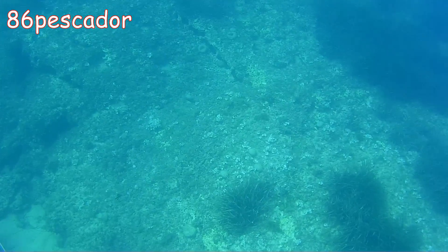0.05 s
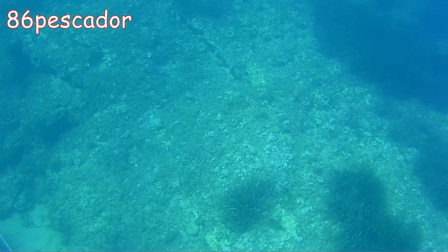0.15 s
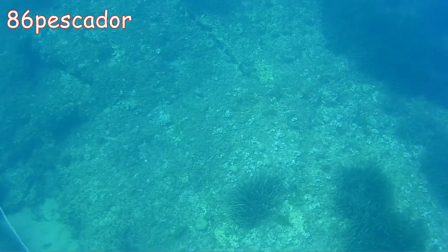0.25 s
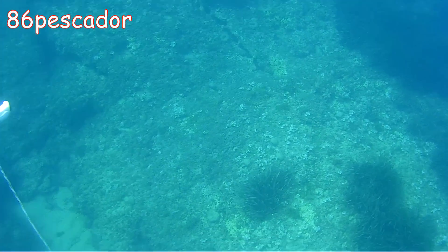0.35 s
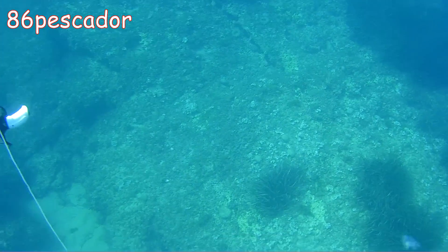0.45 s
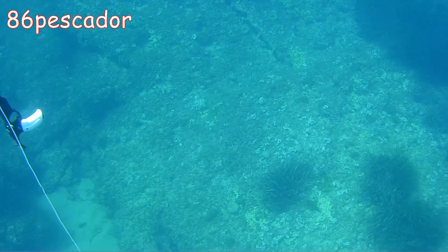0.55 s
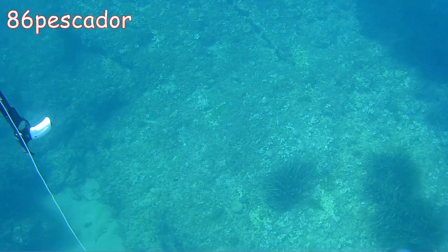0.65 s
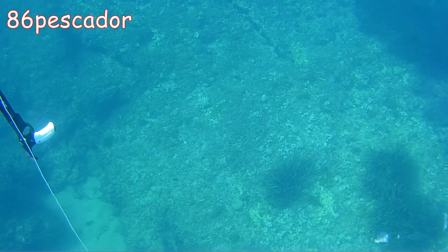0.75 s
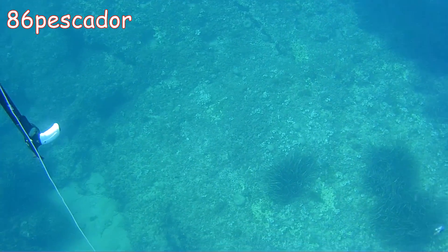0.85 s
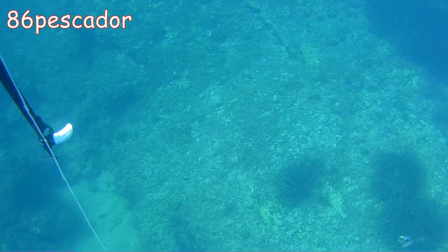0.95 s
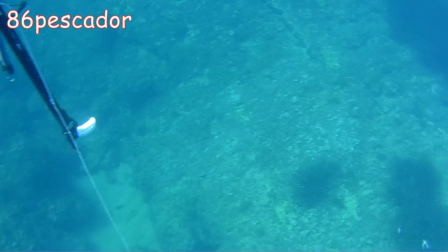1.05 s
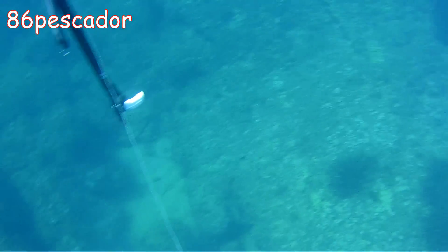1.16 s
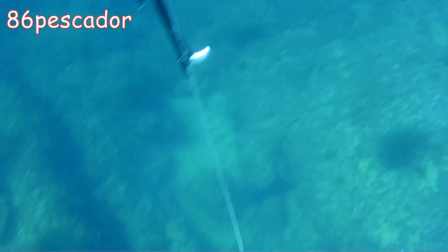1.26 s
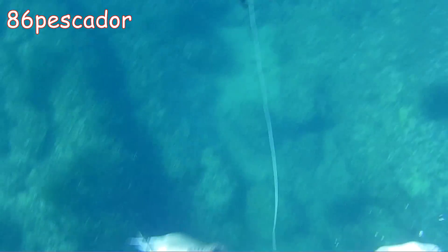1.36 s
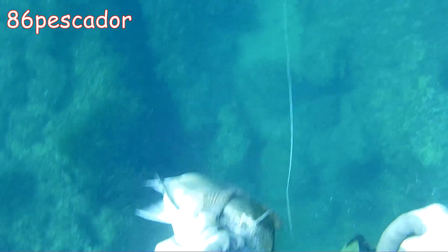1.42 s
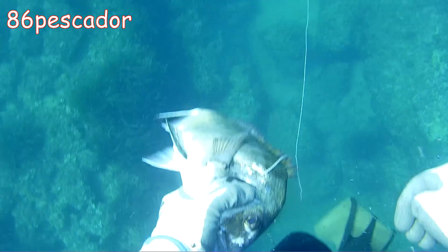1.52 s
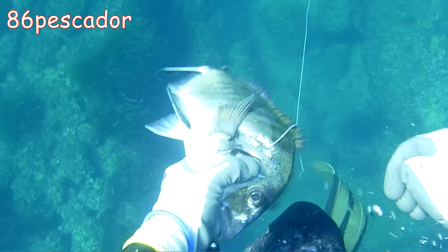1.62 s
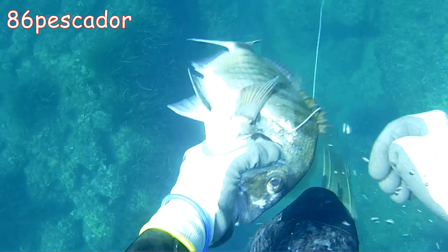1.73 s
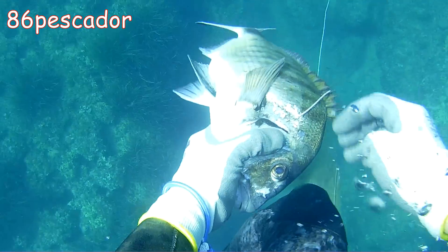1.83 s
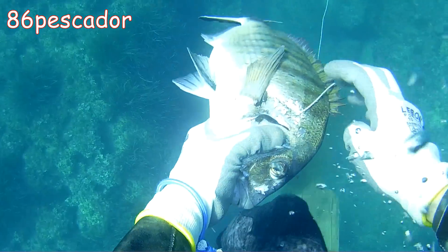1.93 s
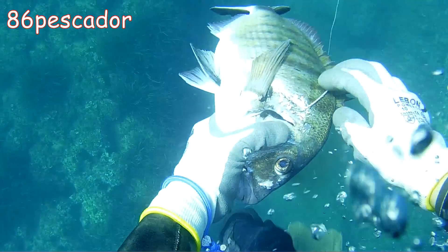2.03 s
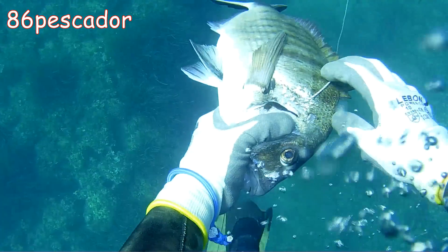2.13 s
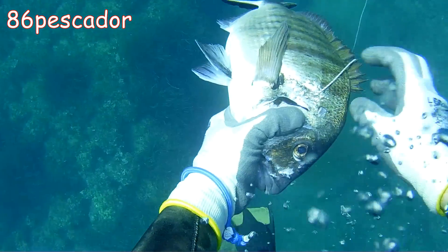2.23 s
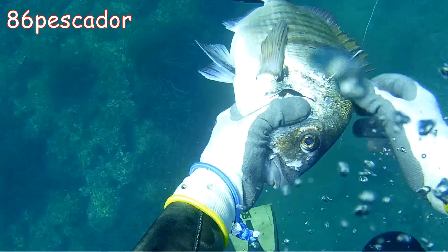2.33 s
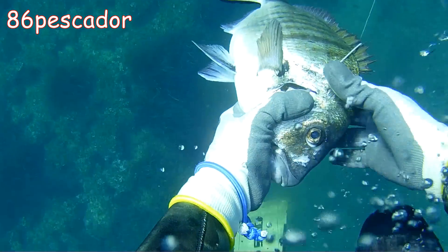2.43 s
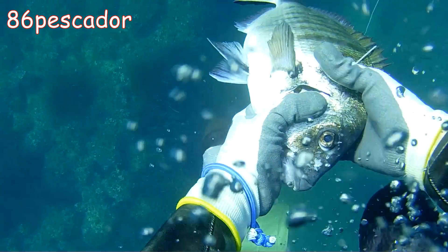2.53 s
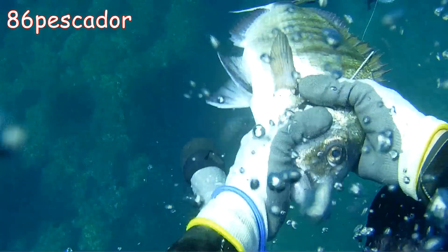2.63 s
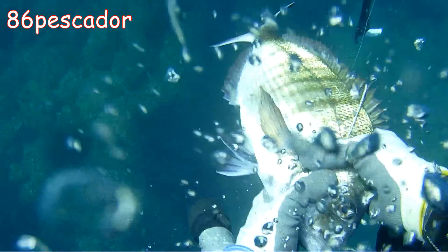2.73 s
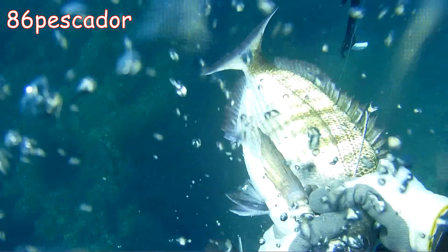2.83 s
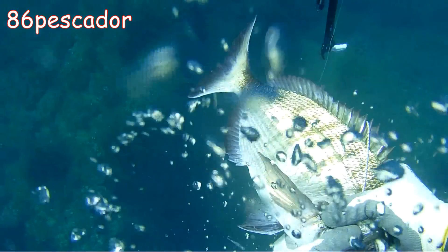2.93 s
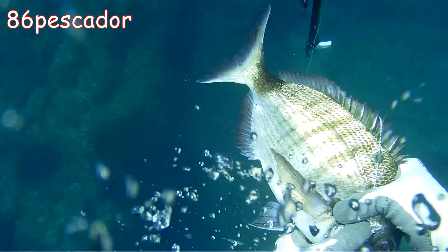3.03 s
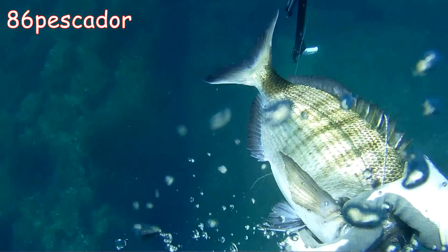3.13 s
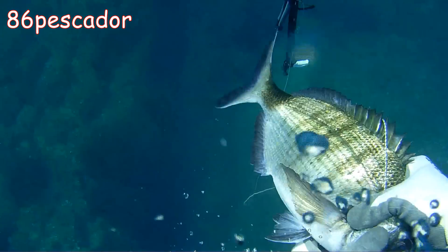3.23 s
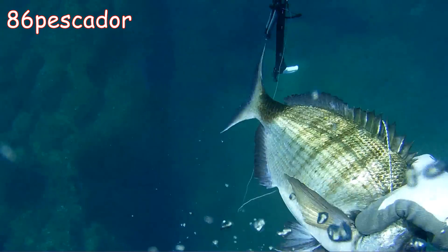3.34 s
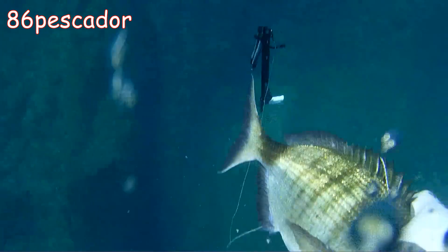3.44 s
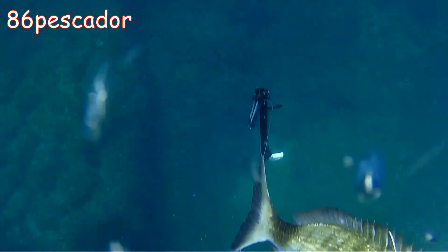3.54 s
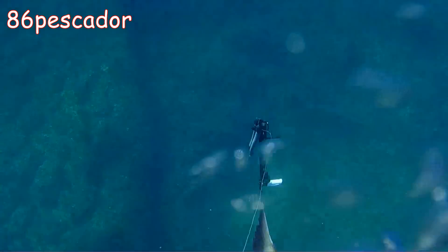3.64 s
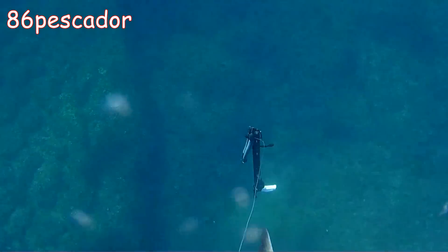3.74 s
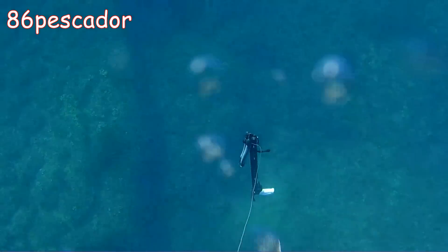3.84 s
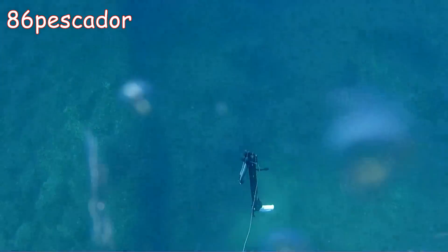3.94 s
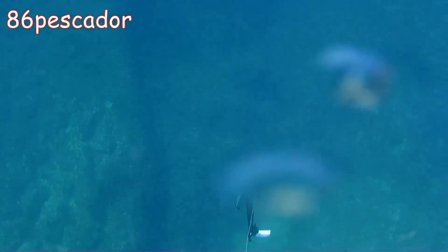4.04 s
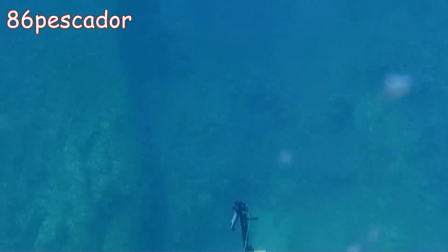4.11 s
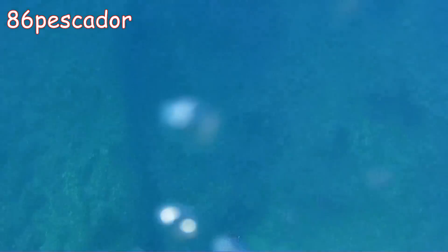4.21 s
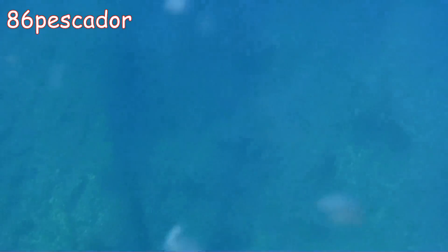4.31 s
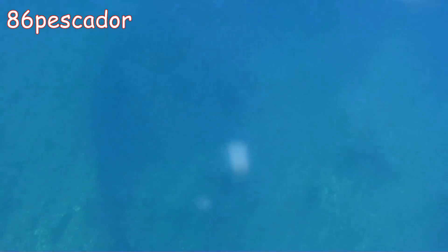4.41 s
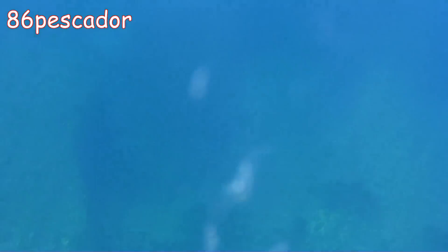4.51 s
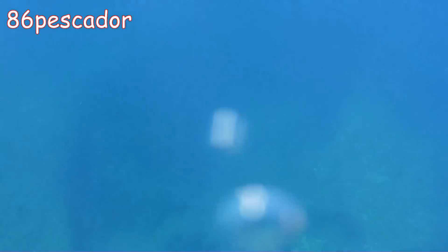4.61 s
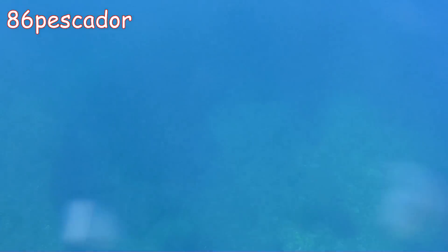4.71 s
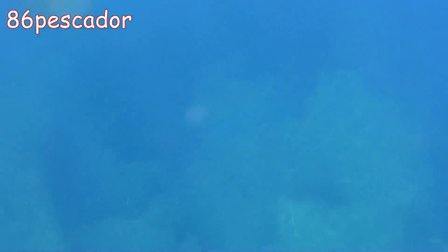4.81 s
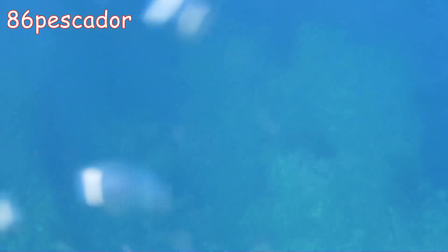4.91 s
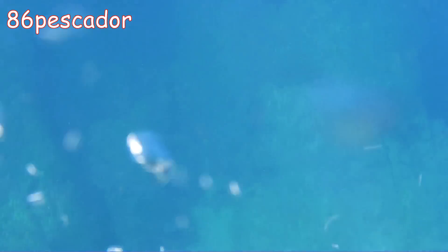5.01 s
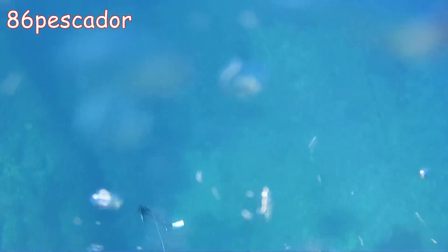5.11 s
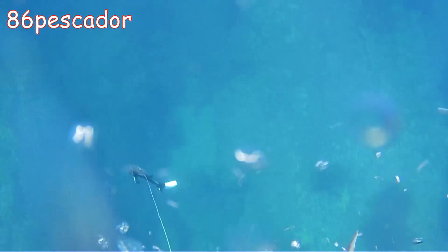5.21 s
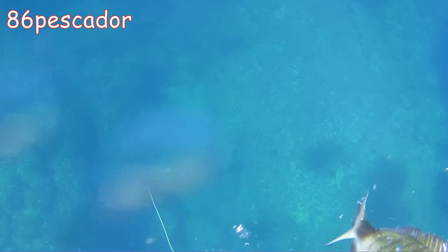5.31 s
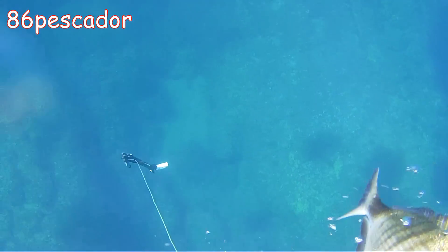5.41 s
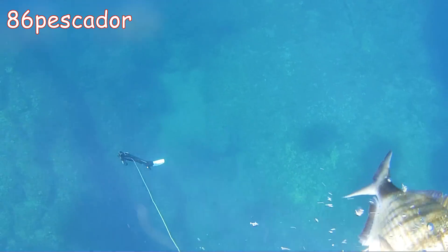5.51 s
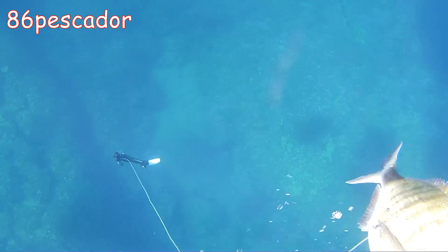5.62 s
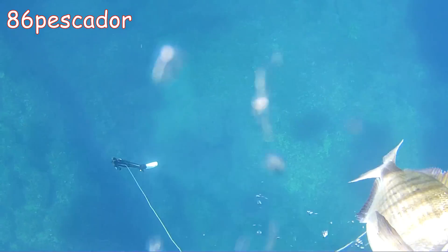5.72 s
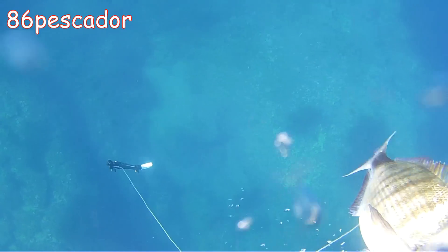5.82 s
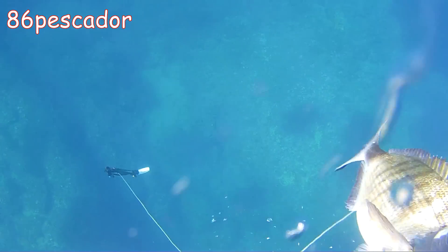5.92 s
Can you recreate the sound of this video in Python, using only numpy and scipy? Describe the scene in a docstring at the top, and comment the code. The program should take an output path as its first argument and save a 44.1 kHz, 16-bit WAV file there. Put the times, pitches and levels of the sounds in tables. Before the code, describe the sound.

A diver handles a fish in the sea, but only water, air and gear are heard. The first second and a half is hushed, with small hard taps. Then air streams past the enclosed microphone in uneven gushes: deep gulps, mid-pitched gurgling, light fizz and a low hum of larger pockets. It dips briefly near five seconds, then close plops return.

```python
"""Air bubbles stream past a camera in a sealed case under water, in gushes, with single bubbles close by.
Each bubble is a short ringing tone with a pitch set by its size: big ones gulp, middling ones gurgle,
small ones fizz. Large air pockets hum low, and the finest bubbles hiss like mist.
The resonances of the case colour the stream, the mist and part of the close bubbles.
Three hard clicks, made of short ringing tones, and a quiet wash of filtered noise for the sea join in."""
import sys
import numpy as np
from scipy import signal
from scipy.fft import rfft, irfft
from scipy.io import wavfile
from scipy.ndimage import uniform_filter1d

SR = 44100
rng = np.random.default_rng(int(sys.argv[2]) if len(sys.argv) > 2 else 0)


def wav_record(signal):
    """Record a signal, one row per channel, as 16-bit PCM in the file named by sys.argv[1]."""
    frames = np.transpose(np.atleast_2d(signal))
    bounded = np.clip(frames, -1, 1)
    # unit amplitude maps onto the largest positive 16-bit level
    quanta = np.round(bounded * 32767).astype(np.int16)
    wavfile.write(sys.argv[1], SR, quanta)


N = 262836
TIME = np.arange(N) / SR  # [s]
# t60 is the time a sound takes to fall by 60 dB; after a gush the small bubbles are gone first
LARGE_T60_S, MIDDLING_T60_S, SMALL_T60_S = 0.75, 0.53, 0.4


def undb(db):
    """Turn decibels into a gain."""
    return 10 ** (np.asarray(db) / 20)


def unit(x):
    """Scale a sound to an rms (average strength) of 1."""
    return x / np.sqrt(np.mean(x ** 2))


def add(out, s, sound):
    """Mix a sound in, starting at time s in seconds."""
    i = int(np.clip(s * SR, 0, N - 1))
    out[i:i + len(sound)] += sound[:N - i]


def slope(points, hz):
    """Read levels off a curve of (frequency [Hz], level [dB]) points, spaced by pitch."""
    point_hz, db = np.transpose(points)
    return np.interp(np.log(hz + 1), np.log(point_hz), db)


def noise(hz, kind, size=N, order=2):
    """White noise at rms 1: "low" keeps what lies below hz, "high" what lies above."""
    cutoff = min(hz, SR / 3)
    sos = signal.butter(order, cutoff, kind, fs=SR, output="sos")
    return unit(signal.sosfilt(sos, rng.standard_normal(size)))


def fade(t, t60):
    """Die away evenly in decibels, by 60 dB in t60 seconds."""
    return np.exp(-np.log(1000) * t / t60)


def through_case(x, size=8192):
    """The case wall dulls a sound, and the resonances of the case ring on after it."""
    # sound through the wall: (frequency [Hz], level [dB])
    wall = [(30, -25), (480, -18), (1000, -9.5), (1900, -12.5), (2400, -17), (3600, -13), (4200, -27.5),
            (7000, -33.5), (9000, -41), (16000, -42)]
    # resonances of the case: (frequency [Hz], width [Hz], lift [dB])
    resonances = [(362, 240, 6), (710.5, 190, 12), (1414, 190, 2.5), (1699, 500, 11.5), (2926, 540, 4),
                  (3273, 93, 6.5), (4740, 650, 8.5)]
    hz = np.arange(size // 2 + 1) * SR / size
    db = slope(wall, hz)
    for center_hz, width_hz, lift_db in resonances:
        db = db + lift_db / (1 + (2 * (hz - center_hz) / width_hz) ** 2)
    # fold the cepstrum to one side, so that the ringing only follows the sound (minimum phase)
    cepstrum = irfft(np.log(undb(db)))
    cepstrum[1:size // 2] *= 2
    cepstrum[size // 2 + 1:] = 0
    response = irfft(np.exp(rfft(cepstrum)))[:size // 2]
    return signal.fftconvolve(x, response)[:N]


def sea(large_db):
    """A dull, even wash of noise; the water rumbles more as the bubbles stir it."""
    # tone colour of the quiet sea: (frequency [Hz], relative level per Hz [dB])
    sea_spectrum = [(12, -33), (20, -8), (163, -13), (262, -14), (698, -19), (1150, -26.5), (3950, -38),
                    (6540, -41), (16000, -47.5)]
    hz = np.arange(N // 2 + 1) * SR / N
    white = rfft(rng.standard_normal(N))
    wash = unit(irfft(white * undb(slope(sea_spectrum, hz)), N))
    rumble = undb(large_db - 27.5) * noise(240, "low")
    return undb(-55) * wash + rumble


def clicks():
    """Sharp taps of the gear: a brief crack of noise together with a handful of short ringing tones."""
    # hard clicks: (time [s], peak of the ringing [dB], treble tilt [dB per octave])
    taps = [(0.0260, -20.5, -5), (1.3550, -18, -2), (1.495, -28.5, -6.5)]
    # tones that a click rings with: (frequency [Hz], level before the tilt [dB], t60 [s])
    modes = [(817, -10, 0.021), (1577, 1, 0.027), (1740, -3, 0.043), (1950, 0.5, 0.012), (2756, 6, 0.015),
             (3430, 10, 0.0068), (6020, 8, 0.013), (6800, -36, 0.0044), (10730, 2, 0.0053)]
    out, t = np.zeros(N), TIME[:SR // 10]
    for s, db, tilt_db in taps:
        ring = np.zeros(len(t))
        for k, (hz, mode_db, t60) in enumerate(modes):
            gain = (-1) ** k * undb(mode_db + tilt_db * np.log2(hz))
            ring += gain * np.sin(2 * np.pi * hz * t) * fade(t, t60)
        crack = undb(-15.5) * noise(8400, "low", len(t), order=1) * fade(t, 0.01)
        add(out, s, undb(db) * (ring / np.abs(ring).max() + crack))
    return out


def bubble(hz, t60, swell, glide):
    """One bubble: its tone swells over `swell` cycles as it pinches off, then dies away, rising in pitch."""
    t = np.arange(int(1.3 * SR * t60) + 20) / SR
    envelope = (1 - np.exp(-t * hz / swell)) * fade(t, t60)
    # glide is the share by which the pitch rises in one t60
    tone = np.sin(2 * np.pi * hz * t * (1 + glide * t / t60 / 2))
    return envelope / envelope.max() * tone


def burst(start, length, t60):
    """Power over time of one release of air: it opens quickly, holds, then dies away."""
    attack_s = 0.022
    t = TIME - start
    opening = np.clip(t / attack_s, 0, 1)
    # squared, because this is power
    return opening * fade(np.maximum(t - length, 0), t60) ** 2


def flow():
    """Levels [dB] of large, middling and small bubbles: gushes add up over a few stray bubbles."""
    # gushes of air: (start [s], length [s], level [dB], lift of the large bubbles [dB],
    # lift of the small bubbles [dB])
    gushes = [(0.508, 0.26, -65, -5, 2.5), (1.578, 0.37, -60, 7.5, -4.5), (1.771, 0.047, -41.5, 4.5, -11.5),
              (1.831, 0.35, -39, 1, -11.5), (2.209, 0.22, -35.5, -2, -9), (2.453, 0.28, -46, 7, -9),
              (2.75, 0.24, -36.5, -3, -14.5), (3.105, 0.27, -40.5, -3, -13.5),
              (3.442, 0.22, -41.5, 1.5, -7), (3.631, 0.17, -36, -8, -12), (3.864, 0.35, -39, -5, -11),
              (4.241, 0.31, -39.5, -3, -10), (4.567, 0.14, -32.5, -2, -15), (4.722, 0.23, -36.5, -3.5, -9),
              (5.016, 0.16, -47, 2, -13.5), (5.337, 0.036, -40.5, 0.5, -6.5), (5.409, 0.081, -33.5, -5, -9),
              (5.569, .19, -37.5, 3, -9.5), (5.795, 0.033, -38.5, 5, -5.5), (5.89, .1, -42, 2, -7.5)]
    # stray bubbles, as power: large, middling, small [dB]
    large, middling, small = undb([-66, -70, -75]) ** 2
    for s, length, db, large_db, small_db in gushes:
        large = large + undb(db + large_db) ** 2 * burst(s, length, LARGE_T60_S)
        middling = middling + undb(db) ** 2 * burst(s, length, MIDDLING_T60_S)
        small = small + undb(db + small_db) ** 2 * burst(s, length, SMALL_T60_S)
    return 10 * np.log10([large, middling, small])


def swarm(level_db, rate, low_hz, high_hz, cycles, spread_db, swell, rise_hz=130):
    """Bubbles of one size class at random moments, most faint and a few near; a weaker flow brings fewer."""
    out = np.zeros(N)
    # rate: possible bubbles per second; cycles: typical number of cycles until 60 dB down
    chance = rng.random((int(rate * N / SR), 5))
    crowd = undb(0.52 * (level_db - level_db.max()))
    for k, (when, small, near, damping, born) in enumerate(chance):
        s = (k + 2 * when) / rate
        share = crowd[min(int(s * SR), N - 1)]
        if born < share:
            hz = low_hz * (high_hz / low_hz) ** small
            t60 = cycles * 2 ** (2 * damping - 1) / hz
            # exponential nearness, up to the closest that a bubble gets
            nearness = min(-np.log(1 - near), 3.2)
            # where bubbles are fewer, each one is stronger
            size = undb(spread_db * nearness) * np.sqrt(hz / low_hz / share)
            add(out, s, size * (-1) ** k * bubble(hz, t60, swell, rise_hz / hz))
    heard = through_case(out)
    # even out the strength over half a second, so that the level follows the flow of air
    strength = np.sqrt(uniform_filter1d(heard ** 2, SR // 2) + 1e-12)
    return undb(level_db) * heard / strength


def mist():
    """A dense cloud of the finest bubbles drifts over the camera and hisses."""
    cloud = burst(3.63, 1.25, SMALL_T60_S) + 1e-9
    level_db = -55.5 + 10 * np.log10(cloud)
    return swarm(level_db, rate=1500, low_hz=7600, high_hz=15700, cycles=26, spread_db=10.0, swell=0.12)


def air_pockets(large_db, width_hz=16):
    """Large air pockets, shaken by the gurgle, hum low; pitch sinks as one grows and rises as it shrinks."""
    # humming pockets: (start [s], length [s], pitch at the start [Hz], glide [octaves per s],
    # level relative to the large bubbles' flow [dB])
    pockets = [(2.651, 0.48, 361.4, -0.063, -12.5), (3.8, 1.3, 316, -.135, -9),
               (5.151, 0.52, 306, .08, -13.5)]
    out = np.zeros(N)
    sos = signal.butter(2, width_hz, fs=SR, output="sos")
    for s, length, hz, glide, db in pockets:
        # slow random shaking spreads the hum a little around its pitch
        shaking = signal.sosfilt(sos, rng.standard_normal((2, N)))
        pitch_hz = hz * 2 ** (glide * (TIME - s))
        phase = 2 * np.pi * np.cumsum(pitch_hz) / SR
        hum = unit(shaking[0] * np.cos(phase) + shaking[1] * np.sin(phase))
        out += hum * undb(db + large_db) * np.sqrt(burst(s, length, 0.27))
    return out


def near_bubbles(splash_t60=0.028, snap_t60=0.0036, shove_t60=0.087):
    """Each close bubble rings and throws a spatter at the case; small ones snap, large ones shove the water."""
    # single bubbles that break off close by:
    # (time [s], pitch [Hz], level before the mix [dB], length until 60 dB down [cycles])
    close_bubbles = [(0.596, 4750, -43.5, 40), (1.569, 808, -41.5, 63), (1.721, 714, -37.5, 29),
                     (1.7544, 715, -25.5, 24), (1.755, 1574, -27, 70), (1.7835, 1552, -25.5, 70),
                     (1.8212, 1490, -26, 34), (1.8645, 614, -14, 19.5), (1.873, 1640, -21.5, 18),
                     (1.8705, 2640, -26.5, 26), (1.91, 700, -13.5, 51), (1.9269, 986, -20, 41),
                     (1.9692, 747, -22, 10), (2.055, 1870, -21, 74), (2.23, 2060, -21.5, 17),
                     (2.373, 1330, -20, 23), (2.3775, 2950, -19, 40), (2.5039, 595, -23.5, 19.5),
                     (2.6285, 10000, -33.5, 38), (2.6612, 501, -18.5, 29), (2.7194, 790, -22.5, 28),
                     (2.9084, 752, -23, 33), (3.2861, 2810, -23, 13), (3.4129, 715, -28.5, 23),
                     (3.459, 896, -24.5, 16), (3.7816, 703, -26, 31.5), (3.8813, 4750, -27.5, 44),
                     (4.7246, 3560, -23.5, 43), (4.735, 7200, -31, 26), (4.7948, 6270, -33.5, 37),
                     (5.184, 1090, -30.5, 26), (5.274, 1604, -32.5, 58), (5.3387, 6200, -42, 32),
                     (5.4008, 2750, -22.5, 19), (5.4814, 4900, -34, 40), (5.571, 4860, -31, 40),
                     (5.5918, 690, -22, 37), (5.6472, 3350, -25.5, 38), (5.6586, 710, -24.5, 17),
                     (5.6695, 637, -17.5, 25), (5.6991, 596, -18, 27), (5.713, 406, -27.5, 30),
                     (5.795, 502, -21, 24), (5.7979, 3680, -21, 9)]
    rings, spatter, pressure = np.zeros((3, N))
    t = TIME[:SR // 10]
    for s, hz, db, cycles in close_bubbles:
        t60 = cycles / hz
        # a bubble that rings long also takes longer to pinch off
        add(rings, s, undb(db) * bubble(hz, t60, 0.016 * cycles, 0.073))
        # the spatter's brightness follows the pitch of the bubble that throws it
        high_pass = signal.butter(1, hz / 4, "high", fs=SR, output="sos")
        grit = unit(signal.sosfilt(high_pass, noise(2 * hz, "low", len(t), order=1)))
        splash = grit * fade(t, splash_t60) * (1 - fade(t, t60 / 2))
        add(spatter, s, undb(db) * splash)
        smallness = hz ** 2 / (hz ** 2 + 2600 ** 2)
        snap = undb(-16) * smallness * noise(hz, "high", len(t), order=1) * fade(t, snap_t60)
        # a low thump within half an octave of 200 Hz
        shove_hz = 200 * 2 ** (rng.random() - 0.5)
        shove = undb(-16.5) * (500 / hz) ** 3 * bubble(shove_hz, shove_t60, 0.65, 0)
        add(pressure, s, undb(db) * snap)
        add(pressure, s, undb(db) * shove)
    on_case = through_case(undb(-13) * rings + undb(1.6) * spatter)
    return undb(2.5) * rings + pressure + on_case


def spurts(rate=45, t60=0.05, depth_db=4.0):
    """Air tears off in quick random spurts, about `rate` a second, that lift all bubble sizes at once [dB]."""
    kicks = (rng.random(N) < rate / SR) * 1.0
    surge = np.minimum(signal.fftconvolve(kicks, fade(TIME[:SR // 10], t60))[:N], 1)
    return depth_db * unit(surge - surge.mean())


def stream(large, middling, small):
    """The rising cloud: bubbles from large to tiny, and churning water that shakes the case."""
    gurgle = swarm(large - 1.1, rate=420, low_hz=487.7, high_hz=1130, cycles=36, spread_db=3.5, swell=0.04)
    babble = swarm(middling - 0.9, rate=900, low_hz=1136, high_hz=2285, cycles=30, spread_db=4.5, swell=0.24)
    fizz = swarm(small - 0.6, rate=900, low_hz=2400, high_hz=7690, cycles=60, spread_db=6.5, swell=0.17)
    # the finest bubbles, as lone pricks
    prickle = swarm(small - 12, rate=1000, low_hz=5560, high_hz=13300, cycles=67, spread_db=19.0, swell=0.52)
    churn = undb(large - 7.5) * unit(through_case(noise(422, "low")))
    surge = spurts()
    # the small bubbles follow each spurt most closely
    return undb(surge / 2) * (gurgle + babble + churn) + undb(surge) * (fizz + prickle)


def scene():
    """Everything added up at the one microphone."""
    large, middling, small = flow()
    background = sea(large) + clicks() + mist()
    bubbles = air_pockets(large) + near_bubbles() + stream(large, middling, small)
    return (background + bubbles)[None]


def record(dry):
    """The camera cuts the top, above 15900 Hz."""
    sos = signal.ellip(10, 0.1, 70, 15900, fs=SR, output="sos")
    return signal.sosfilt(sos, dry)


dry = scene()
out = record(dry)
wav_record(out)
```